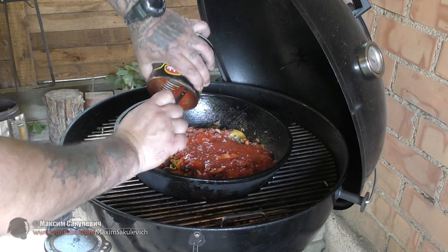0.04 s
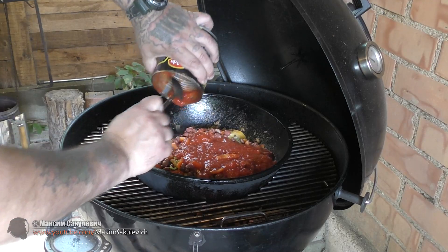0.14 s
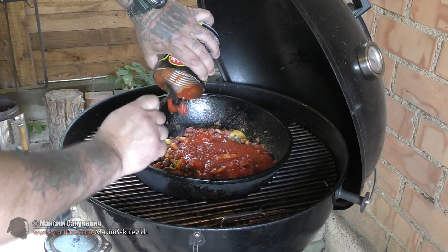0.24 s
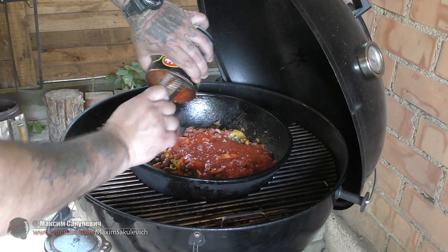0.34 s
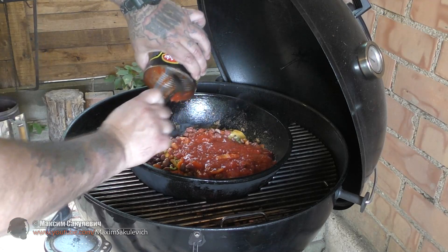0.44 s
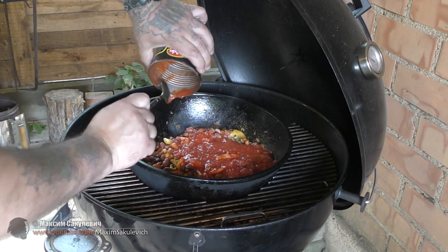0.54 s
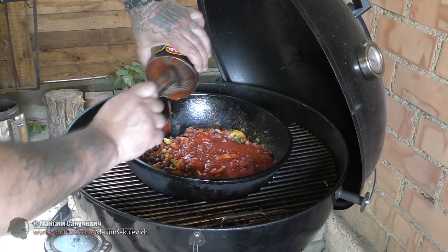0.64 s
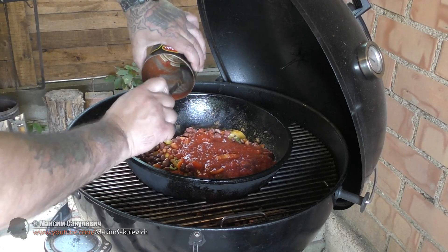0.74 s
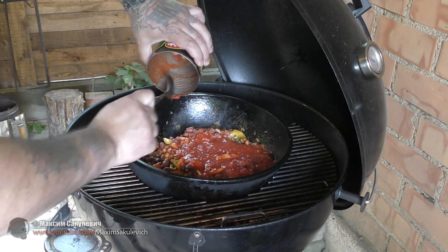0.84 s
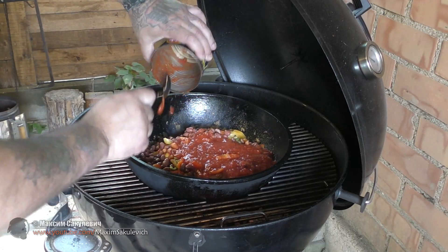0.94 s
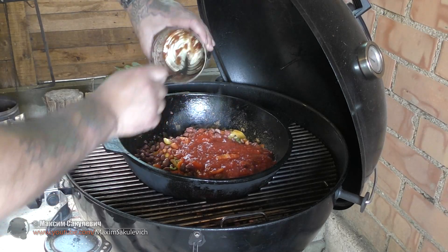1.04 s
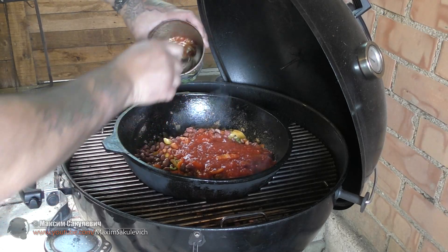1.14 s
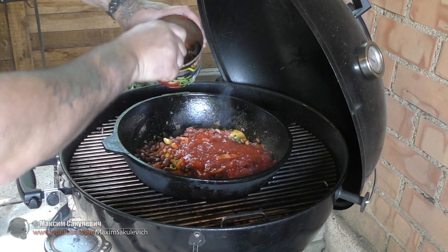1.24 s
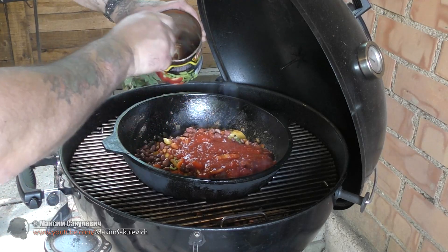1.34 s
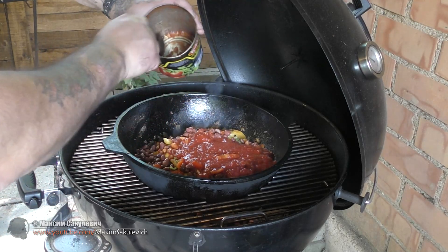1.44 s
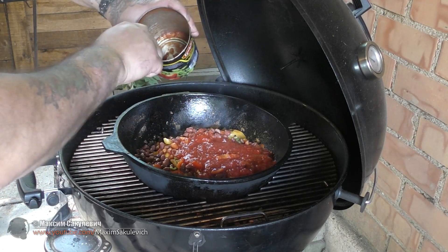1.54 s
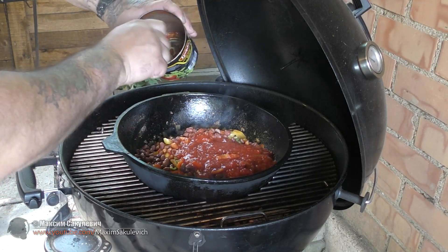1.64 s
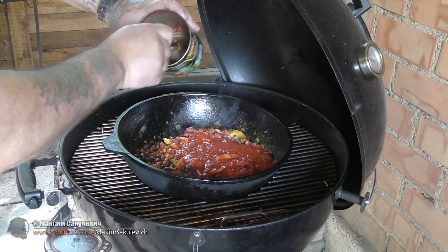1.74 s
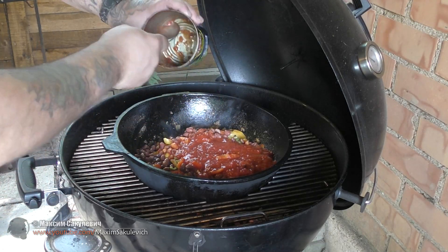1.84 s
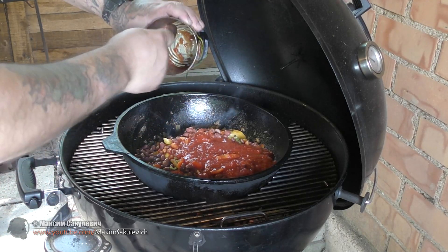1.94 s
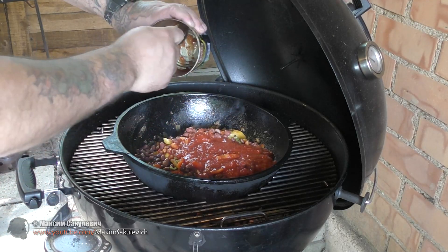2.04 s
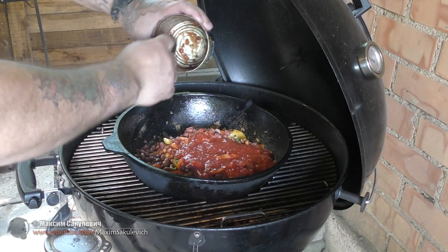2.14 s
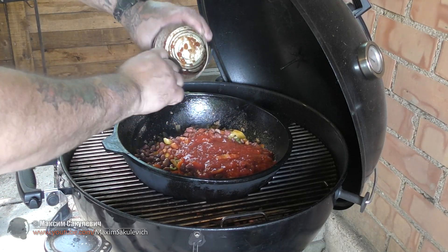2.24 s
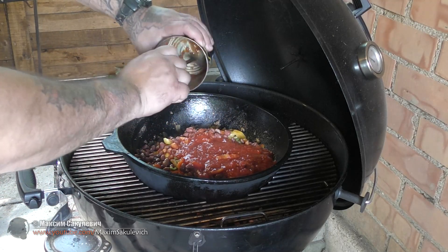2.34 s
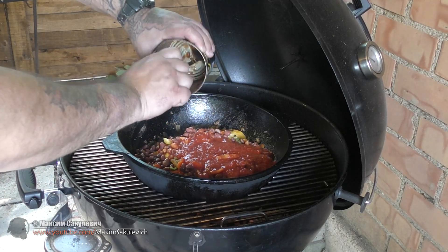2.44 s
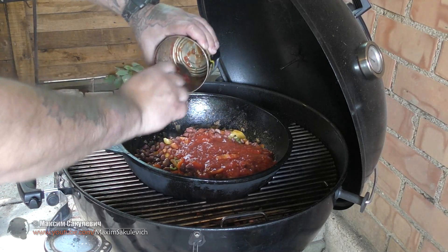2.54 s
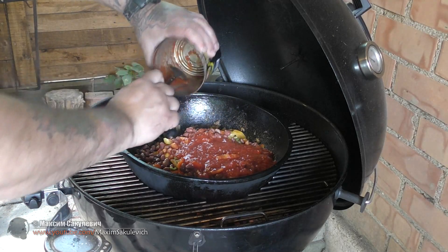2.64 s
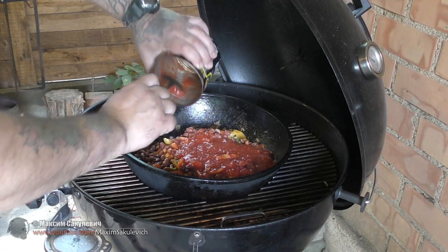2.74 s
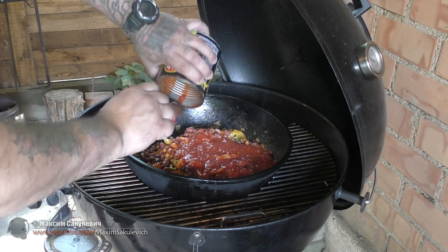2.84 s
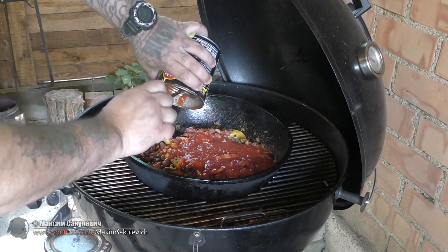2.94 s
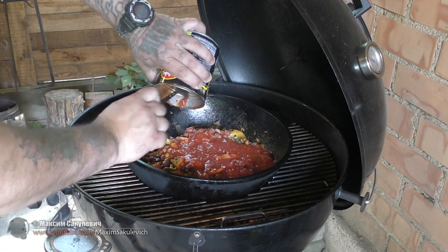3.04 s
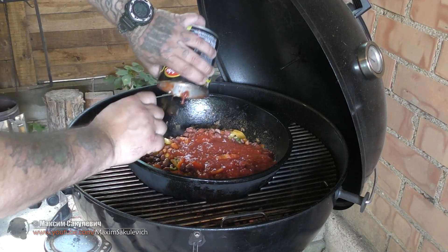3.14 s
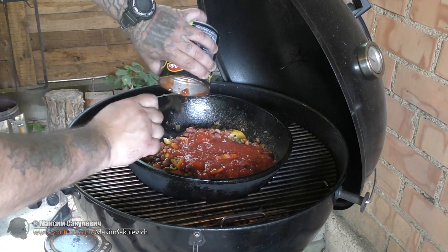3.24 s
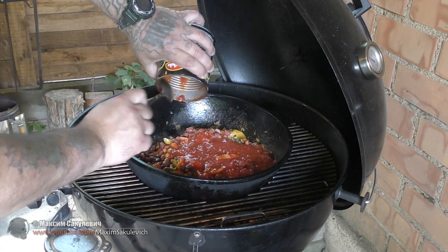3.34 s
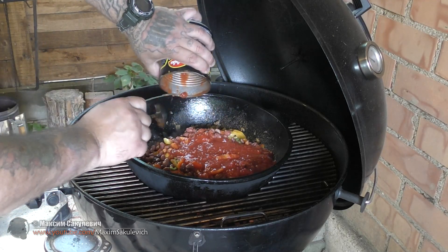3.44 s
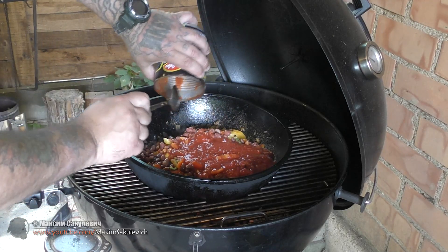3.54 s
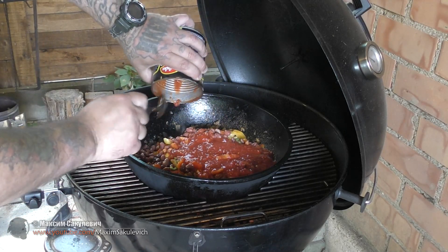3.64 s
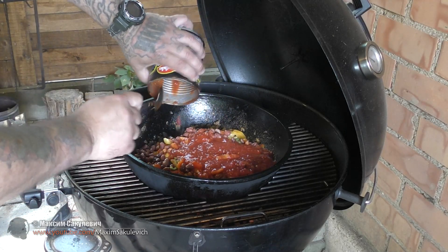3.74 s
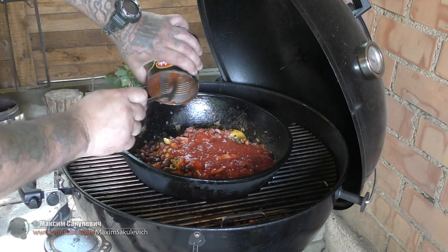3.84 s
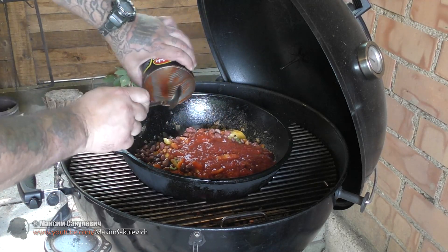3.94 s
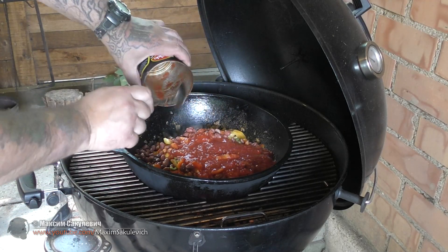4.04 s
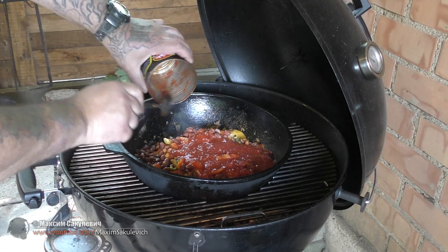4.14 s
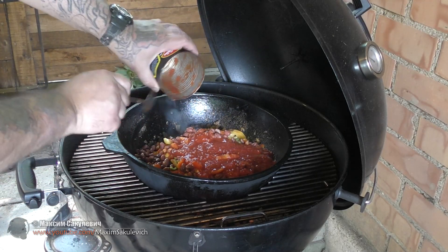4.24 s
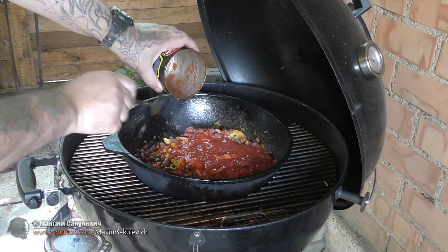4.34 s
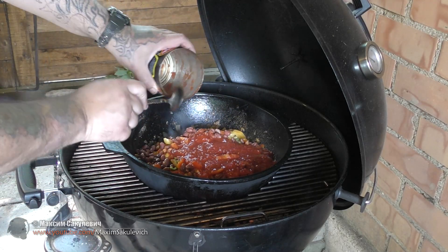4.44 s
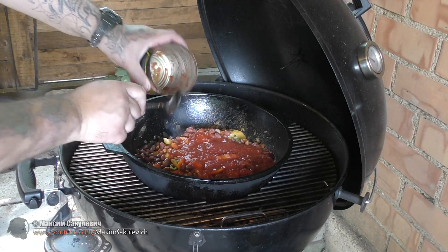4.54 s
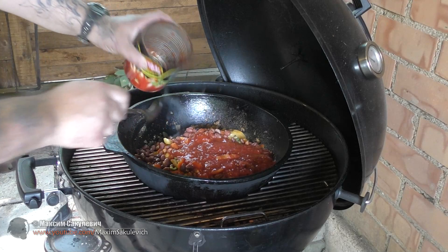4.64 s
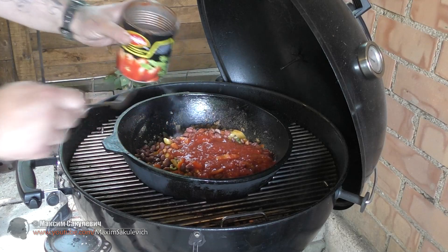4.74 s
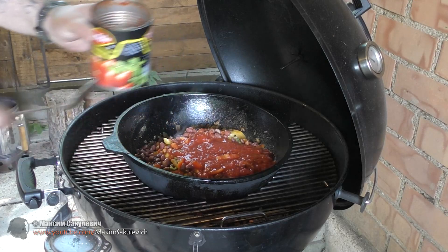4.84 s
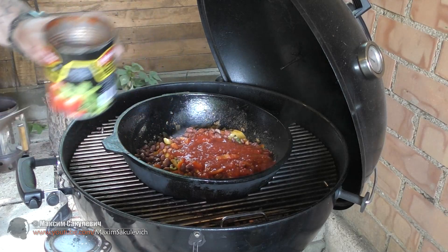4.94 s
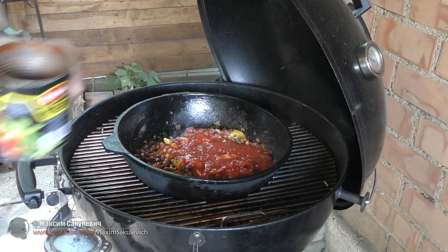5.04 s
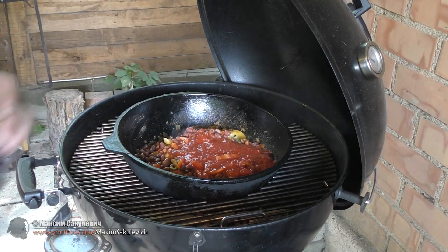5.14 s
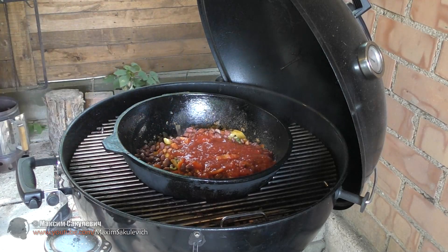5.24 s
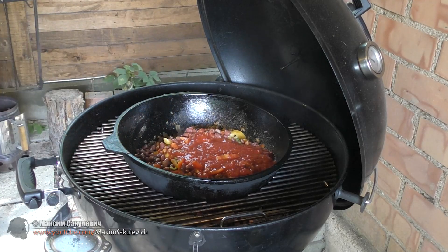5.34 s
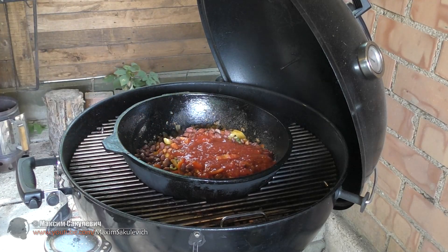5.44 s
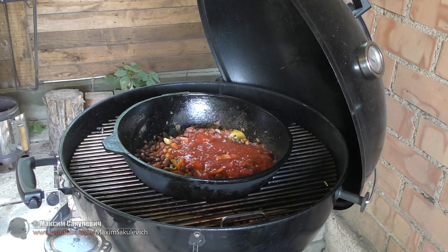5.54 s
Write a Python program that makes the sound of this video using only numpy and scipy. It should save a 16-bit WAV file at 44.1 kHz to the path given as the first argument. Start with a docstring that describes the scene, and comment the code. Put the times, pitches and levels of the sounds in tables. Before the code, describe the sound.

Hollow clunks, clicks and short rasps of a spoon emptying a tin can, with soft frying and a low outdoor rumble behind.

```python
"""In a yard, over a pan on an open kettle grill, a steel spoon knocks and scrapes tomato out of a tin can.
Steam bubbles sizzle faintly in the pan above a low outdoor rumble. Impact and stick-slip friction excite
the modes of the can's hollow and thin wall, and hand and spoon keep shifting these resonances.
Lumps drop into the pan; the emptier the can, the more it clanks.
The grill lid, a brick wall and a fence reflect the sound of the spoon's work."""
import sys
import numpy as np
from scipy import signal
from scipy.fft import rfft, irfft
from scipy.io import wavfile
from scipy.ndimage import uniform_filter1d, minimum_filter1d

SR = 44100
rng = np.random.default_rng(int(sys.argv[2]) if len(sys.argv) > 2 else 0)


def to_wav(sig):
    """Store sig (one row per channel, or 1-D mono) as 16-bit WAV at the path in sys.argv[1].

    Samples outside -1..1 are clipped; the rate is SR.
    """
    pcm = np.clip(np.atleast_2d(sig), -1, 1) * 32767
    pcm = np.round(pcm).astype(np.int16)
    wavfile.write(sys.argv[1], SR, pcm.T)  # frames by channels


N = 246298
AGE = np.arange(int(.3 * SR)) / SR   # t/s since a contact began


def from_db(db):
    """Amplitude ratio of a level in decibels."""
    return 10 ** (np.asarray(db) / 20)


def rms_one(x):
    """Normalisation to rms 1."""
    return x / np.sqrt(np.mean(x ** 2) + 1e-20)


def at_level(x, db):
    """Equal energy: a transient gets the energy of 10 ms of steady sound at this level."""
    return from_db(db) * x / np.sqrt(np.sum(x ** 2) / (SR / 100) + 1e-20)


def value_at(s, rows):
    """Linear interpolation in rows of (t/s, value)."""
    return np.interp(s, *np.transpose(rows))


def band(x, edges_hz, order=2):
    """Causal band-pass filtering."""
    return signal.sosfilt(signal.butter(order, edges_hz, "band", fs=SR, output="sos"), x + 1e-18)


def resonate(x, hz, width_hz):
    """A damped oscillator, driven by x, with gain 1 at resonance."""
    radius = np.exp(-np.pi * width_hz / SR)
    feedback = [1, -2 * radius * np.cos(2 * np.pi * hz / SR), radius ** 2]
    return signal.lfilter(np.array([1, 0, -1]) * (1 - radius ** 2) / 2, feedback, x + 1e-18)


def colour(x, spectrum):
    """Spectral shaping by rows of (f/Hz, level/dB); rms 1."""
    hz, db = np.transpose(spectrum)
    bins_hz = np.maximum(np.fft.rfftfreq(N, 1 / SR), 1)
    gain = from_db(np.interp(np.log(bins_hz), np.log(hz), db))
    return rms_one(irfft(rfft(x) * gain, N))


def grains(size, per_s, spread_db):
    """Shot noise: clicks at random moments, of uneven size and either sign; rms 1."""
    born = rng.random(size) < per_s / SR
    sign = np.sign(rng.standard_normal(size))
    strength = from_db(spread_db * np.minimum(rng.standard_normal(size), 2))
    return rms_one(born * sign * strength)


def sizzle(gain_db=-4.0):
    """Superposition: countless tiny steam bubbles burst under the sauce and merge into a hiss, under which the
    can hums faintly."""
    # the frying dies down as cold tomato covers the pan: (t/s, relative level/dB)
    frying = [(0.0, -46), (2.7, -47), (4.9, -50.5), (5.58, -57)]
    # spectrum of the background: steam hiss, with a faint hum of the can ringing on around 400-700 Hz: (f/Hz,
    # relative spectral level/dB)
    spectrum = [(240, -50), (400, -2), (506, 5.5), (680, -0.5), (765, -2.5), (1320, -3.5), (1880, -10.5),
                (2380, -6.5), (2920, -6.5), (5260, -0.5), (8430, -7), (10400, -16.5), (13500, -51)]
    bursts = colour(grains(N, per_s=8000, spread_db=4.5), spectrum)
    return from_db(gain_db + value_at(np.arange(N) / SR, frying)) * bursts


def rumble(level_db=-46.5, waver_db=2.5, waver_s=0.073):
    """Random amplitude modulation: a low outdoor noise wavers a little."""
    # spectrum of the rumble: (f/Hz, relative spectral level/dB)
    spectrum = [(20, -34), (30, -13), (40, 4.5), (48, 1), (62, -1.5), (85, -11), (115, -22.5), (155, -13.5),
                (215, -16), (270, -23.5), (330, -38), (600, -48.5)]
    waver = rms_one(uniform_filter1d(rng.standard_normal(N), int(waver_s * SR)))
    return from_db(level_db + waver_db * waver) * colour(rng.standard_normal(N), spectrum)


def knock(s, chatter_t60, *touch, crack_db=5, crack_t60=.016, judder_db=-27, cushion_s=.0016):
    """Impact excitation: the spoon lands with a crack, cushioned by sauce, and chatters to rest."""
    levels_db, cavity_hz, ring = contact(s, *touch, ring_db=12)
    chatter = from_db(-60 * AGE / chatter_t60)
    crack = from_db(crack_db - 60 * AGE / crack_t60)
    force = (chatter + crack) * (1 - np.exp(-AGE / cushion_s))
    friction = force * grains(len(AGE), per_s=10000, spread_db=1.5)
    push = (AGE == 0) + from_db(judder_db) * chatter * rng.standard_normal(len(AGE))
    return s, can(s, push, friction, levels_db, ring, cavity_hz, cavity_width_hz=280)


def contact(s, hollow_db, wall_db, bite_db, ring_hz, ring_db):
    """Energy partition: bite, how squarely steel meets tin, trades one ring for thud, clank and edge."""
    # sauce left in the can adds thud and muffles the clank: (t/s, thud gain/dB)
    sauce = [(0.0, 3), (3.4, 1.5), (3.7, -1.5), (4.6, -10.5)]
    # resonance of the air in the can, lower as the spoon hand covers the mouth: (t/s, f/Hz)
    mouth = [(0.1, 520.7), (0.77, 591), (0.95, 665), (1.35, 747.3), (1.75, 623.4), (2.0, 709.6),
             (2.35, 610), (2.51, 662.6), (2.74, 600.8), (2.82, 662), (2.88, 535), (2.99, 703), (3.1, 683),
             (3.17, 550), (3.44, 531), (3.66, 722.4), (4.5, 646.7), (4.61, 598)]
    sauce_db, cavity_hz = value_at(s, sauce), value_at(s, mouth)
    # the held can gives way, so its thud grows less than the wall's sound
    thud_db = -31.5 + 0.53 * wall_db + bite_db + sauce_db
    # the clank lies between hollow and wall, and follows both
    clank_db = -14 + wall_db + 0.26 * (hollow_db - wall_db) + 2 * bite_db - 0.84 * sauce_db
    edge_db = -4.5 + wall_db + bite_db
    ring = (ring_hz, ring_db - 0.53 * bite_db)
    return (thud_db, hollow_db, clank_db, wall_db, edge_db), cavity_hz, ring


def can(s, push, friction, levels_db, ring, cavity_hz, cavity_width_hz):
    """Forced vibration: the slow push moves the whole can, the fine friction shakes its wall."""
    # the can rings more freely while it is held up and open: (t/s, damping factor)
    grip = [(0.9, 0.81), (1.4, 1.19), (2.6, 0.83), (3.1, 1.07), (3.7, 1.43), (4.3, 1.23)]
    damping = value_at(s, grip)
    thud_db, hollow_db, clank_db, rasp_db, edge_db = levels_db
    tin = wall(friction, damping, *ring)
    return (at_level(band(push, (164.5, 293)), thud_db)
            + at_level(hollow(push, damping, cavity_hz, cavity_width_hz), hollow_db)
            + at_level(band(tin, (796, 2540), order=4), clank_db)
            + at_level(band(tin, (2850, 6030), order=4), rasp_db)
            + at_level(band(tin, (6040, 8890)), edge_db))


def wall(friction, damping, ring_hz, ring_db, direct_db=-11, scatter_db=5.0, grip_shift=0.01):
    """Modal superposition: each contact point drives the modes differently, and one region rings out."""
    # bending modes of the tin wall: (f/Hz, bandwidth/Hz, relative level/dB)
    modes = [(977, 15, -59), (1086, 40.6, 9.5), (1154, 30, 1), (1420, 10.4, -2.5), (1540, 7.3, -30),
             (1630, 23, -17), (1890, 15, -3), (1952, 18, 1.5), (2089, 36, -2), (2139, 21, 6), (2310, 43, 0),
             (2586, 13, -1), (2750, 39, -12), (3000, 92, -2.5), (3090, 110, -16), (3385, 110, 1.5),
             (3473, 330, -13.5), (3580, 65, 1), (3950, 77, 0), (4153, 93, 6), (4543, 140, 0),
             (4934, 28, 6.5), (5320, 180, -3.5), (5200, 49, -60), (5950, 150, -13), (6220, 16, -0.5),
             (6600, 45, -29), (7240, 130, -5.5), (7860, 30, -56), (9260, 230, -12.5)]
    chance = rng.standard_normal((len(modes), 2))
    out = from_db(direct_db) * friction
    for k, ((hz, width, db), (strength, shift)) in enumerate(zip(modes, chance)):
        # less damping gives a narrower, taller peak
        mode = resonate(friction, hz * (1 + grip_shift * shift), width * damping) / damping
        out = out + (-1) ** k * from_db(db + scatter_db * strength) * mode
    return out + from_db(ring_db - 3.5) * resonate(friction, ring_hz, width_hz=200)


def hollow(push, damping, cavity_hz, cavity_width_hz, grip_shift=0.0075):
    """Cavity resonance: base and enclosed air boom; the hand over the mouth favours one pitch."""
    # modes of the can's base and the air inside: (f/Hz, bandwidth/Hz, relative level/dB)
    modes = [(386, 36, -0.5), (470.6, 49, -3), (500.7, 50, 1), (599.1, 15.5, 7.5), (632.7, 15.2, 1.5),
             (695.6, 30.4, -0.5), (718.3, 15.3, 6)]
    shift = 1 + grip_shift * rng.standard_normal()
    base_damping = damping ** 0.62   # the hand affects the base less than the wall
    boom = sum(from_db(db) * resonate(push, hz * shift, width * base_damping) for hz, width, db in modes)
    # two resonators in series: the air takes a few cycles to swing up
    air = resonate(resonate(boom, cavity_hz, cavity_width_hz), cavity_hz, cavity_width_hz)
    return band(air, (370, 780), order=4)


def scrape(hardest_s, swell_s, release_s, *touch, smooth_share=1.1, sing_db=-16, sink_octaves_per_s=2.6):
    """Sliding friction: the spoon's edge drags over the ribbed wall as pressure swells and lets go."""
    levels_db, cavity_hz, ring = contact(hardest_s, *touch, ring_db=5.5)
    pressure = np.interp(AGE, [0, swell_s, swell_s + release_s], [0, 1, 0]) ** 2
    catching = slips(per_s=130, unevenness=0.41, slip_s=0.0021)
    friction = pressure * (smooth_share + catching) * grains(len(AGE), per_s=16000, spread_db=-1.5)
    # the judder locks on to the air inside, whose pitch sinks as the spoon goes deeper
    judder_hz = cavity_hz * 2 ** (sink_octaves_per_s * (swell_s - AGE))
    singing = from_db(sing_db) * np.sin(2 * np.pi * np.cumsum(judder_hz) / SR)
    push = pressure * (catching * rng.standard_normal(len(AGE)) + singing)
    start_s = hardest_s - swell_s
    return start_s, can(start_s, push, friction, levels_db, ring, cavity_hz, cavity_width_hz=290)


def slips(per_s, unevenness, slip_s, count=160):
    """Stick-slip motion: the friction force jumps at uneven intervals and relaxes; rms 1."""
    gaps_s = np.exp(unevenness * rng.standard_normal(count)) / per_s
    at = (np.cumsum(gaps_s) * SR).astype(int)
    jumps = np.bincount(at, rng.uniform(0.076, 1, count), len(AGE))[:len(AGE)]
    return rms_one(signal.lfilter([1], [1, -np.exp(-1 / (slip_s * SR))], jumps + 1e-18))


def plop(s, db, t60=0.097, band_hz=(160, 330)):
    """Inelastic impact: a soft lump lands in the sauce with a short, dull thud."""
    burst = from_db(-60 * AGE / t60) * rng.standard_normal(len(AGE))
    return s, at_level(band(burst, band_hz), db)


def spoon():
    """Superposition of transients: blows, strokes and the lumps they loosen, each at its moment."""
    # spoon blows: (t/s, chatter T60/s, hollow level/dB, wall level/dB, bite/dB, wall ring f/Hz)
    blows = [(0.068, 0.086, -32.5, -32, 0.5, 3490), (0.215, 0.041, -20, -30, 2, 5560),
             (0.283, 0.09, -24.5, -30, -0.5, 3430), (0.431, 0.12, -36.5, -34.5, 4, 3000),
             (0.7695, 0.017, -17, -15, -4.5, 4170), (0.968, 0.053, -45, -26.5, -9.5, 4200),
             (1.3445, 0.06, -18.5, -25, 2.5, 5550), (1.393, 0.053, -26, -44, 5.5, 3080),
             (1.459, 0.13, -28.5, -40, 4.5, 4420), (1.4946, 0.07, -21.5, -37, 6.5, 4100),
             (1.516, 0.044, -17.5, -40, -2, 3950), (1.743, 0.022, -26.5, -33, 7, 3100),
             (1.7525, 0.057, -22, -23.5, -4.5, 2980), (1.851, 0.038, -29.5, -35, 2, 4500),
             (1.865, 0.024, -10, -25.5, 1.5, 4430), (1.9155, 0.029, -14, -34.5, 2.5, 1420),
             (2.0738, .14, -43.5, -36, 2, 4330), (2.108, 0.051, -19.5, -26.5, 3, 5900),
             (2.14, .11, -16.5, -35, -5, 2850), (2.182, 0.09, -14.5, -41.5, -2.5, 4020),
             (2.2525, 0.052, -27, -30, 0.5, 3390), (2.343, 0.075, -17, -26.5, -1, 4180),
             (2.4475, .033, -37, -28, 3.5, 6480), (2.5088, 0.053, -18, -25, 2, 2950),
             (2.598, 0.058, -17.5, -20.5, -0.5, 4020), (2.614, 0.024, -12, -24.5, -0.5, 2720),
             (2.7235, 0.024, -12.5, -47, -10, 4280), (2.759, 0.45, -17, -33, 3, 7930),
             (2.781, 0.13, -21, -31.5, 1, 3450), (2.8156, 0.13, -15, -23, 3, 3950),
             (2.841, 0.082, -19, -33, -3, 6500), (2.856, .024, -26, -28, -3, 4000),
             (2.8795, 0.019, -19, -29.5, -0.5, 4740), (2.988, 0.051, -10, -12.5, -2, 5820),
             (3.098, .11, -24.5, -20.5, 3, 3210), (3.165, 0.072, -22, -22.5, -1, 4930),
             (3.199, 0.052, -30, -28.5, 2.5, 3830), (3.418, 0.08, -17.5, -20, 8, 1120),
             (3.6625, .1, -21, -10, -1, 4860), (3.779, 0.069, -23, -21.5, -3, 5460),
             (4.1685, 0.078, -18.5, -17.5, -3.5, 5170), (4.469, 0.1, -28, -29, -4, 4660),
             (4.5078, 0.045, -16.5, -24.5, 0.5, 4050), (4.608, .056, -30.5, -33, 1, 5000)]
    # spoon strokes, and a last faint rub as the can is put away:
    # (hardest t/s, swell/s, release/s, hollow level/dB, wall level/dB, bite/dB, wall ring f/Hz)
    strokes = [(0.111, 0.023, 0.094, -48, -37, 2, 3810), (0.195, .056, 0.11, -29, -28, -0.5, 3670),
               (0.242, .058, 0.048, -17.5, -23, 2.5, 5630), (0.529, 0.09, 0.2, -36.5, -31, 1.5, 3560),
               (0.585, 0.024, 0.081, -31, -44.5, 3.5, 4530), (0.94, 0.038, 0.034, -26.5, -26, 0.5, 4750),
               (1.239, 0.097, 0.63, -42, -37.5, 2.5, 6360), (1.429, .074, 0.18, -41, -29.5, -4, 2920),
               (1.52, .036, 0.12, -16, -32.5, 0.5, 4170), (1.864, .034, 0.012, -26, -25.5, 0, 4430),
               (2.124, .05, 0.032, -32, -32, 3.5, 5960), (2.215, 0.042, 0.088, -14.5, -37, 1, 4070),
               (2.29, .04, 0.19, -34.5, -40, 2, 3420), (2.36, 0.055, 0.019, -19, -27.5, -0.5, 4180),
               (2.481, 0.056, 0.055, -35.5, -30.5, 4.5, 7300), (2.61, 0.06, 0.032, -14.5, -25, 5.5, 3970),
               (2.735, .049, 0.046, -13, -24.5, 2, 6960), (2.84, .033, 0.068, -19.5, -21.5, 3, 3960),
               (3.115, .014, 0.059, -24, -29, -20, 3130), (3.179, .022, 0.049, -17.5, -23.5, -0.5, 5000),
               (3.436, 0.017, 0.083, -20.5, -28.5, 0, 6500),
               (3.705, 0.036, 0.087, -25.5, -29.5, -0.5, 4950), (3.85, 0.057, 0.087, -38, -47, 6, 2280),
               (4.238, 0.051, 0.11, -28.5, -15.5, -7, 5230), (4.29, .065, 0.037, -18.5, -31, 3.5, 2250),
               (4.525, .028, .083, -30, -34.5, -14, 4100), (4.617, .033, 0.037, -27, -24, -8.5, 5040),
               (5.16, .036, 0.018, -59, -55.5, 4.5, 5800)]
    # lumps of tomato drop into the pan: (t/s, level/dB)
    lumps = [(0.431, -34.5), (3.097, -30)]
    out = np.zeros(N + len(AGE))
    for source, rows in (knock, blows), (scrape, strokes), (plop, lumps):
        for row in rows:
            start_s, sound = source(*row)
            at = round(start_s * SR)
            out[at:at + len(AGE)] += sound
    return out[:N]


def yard(x, first_echo_s=0.0016):
    """Diffuse reflection: scattered echoes from lid, wall and fence decay exponentially."""
    # echoes of the yard: (low f/Hz, high f/Hz, level/dB re the direct sound, T60/s)
    echo_bands = [(193, 1090, -12, 0.15), (945, 3160, -8.5, 0.19), (3200, 18000, -21, 0.2)]
    echoes = 0
    for low_hz, high_hz, db, t60 in echo_bands:
        tail = band(grains(len(AGE), per_s=3500, spread_db=2.5), (low_hz, high_hz))
        tail = tail * (AGE > first_echo_s) * from_db(-60 * AGE / t60)
        band_share = (high_hz - low_hz) / (SR / 2)
        echoes = echoes + from_db(db) * tail * np.sqrt(band_share / np.sum(tail ** 2))
    return signal.fftconvolve(x, echoes)[:N]


def limiter(x, ceiling_db=-10.5, release_db_per_s=130, ramp_samples=64):
    """Peak limiting: the gain drops just ahead of each loud peak and creeps back."""
    over_db = np.maximum(20 * np.log10(np.abs(x).max(axis=0) + 1e-9) - ceiling_db, 0)
    creep_db = release_db_per_s * np.arange(N) / SR
    held_db = np.maximum.accumulate(over_db + creep_db) - creep_db
    gain_db = uniform_filter1d(minimum_filter1d(-held_db, ramp_samples), ramp_samples)
    return x * from_db(gain_db)


def scene():
    """Sound pressures add at one microphone, heard alike in both ears."""
    direct = spoon()
    return np.tile(direct + yard(direct) + sizzle() + rumble(), (2, 1))


def record(dry, roll_off_hz=10400, cutoff_hz=13600):
    """Low-pass filtering and limiting: the treble rolls away, peaks are held down, the top is cut."""
    dull = signal.sosfilt(signal.butter(6, roll_off_hz, fs=SR, output="sos"), dry)
    return signal.sosfilt(signal.ellip(10, .1, 80, cutoff_hz, fs=SR, output="sos"), limiter(dull))


dry = scene()
out = record(dry)
to_wav(out)
```